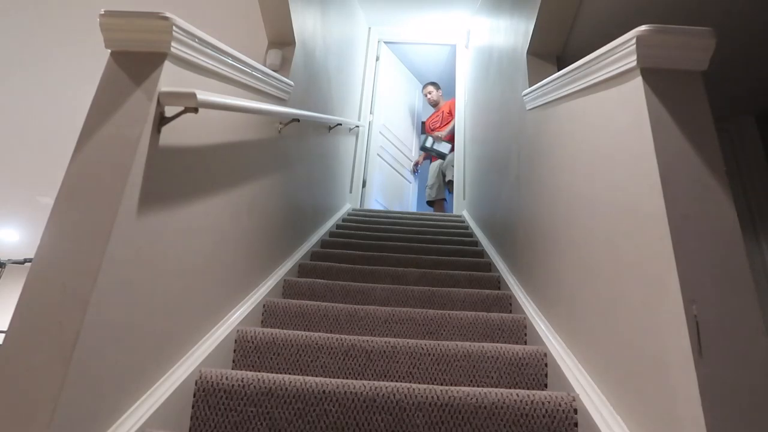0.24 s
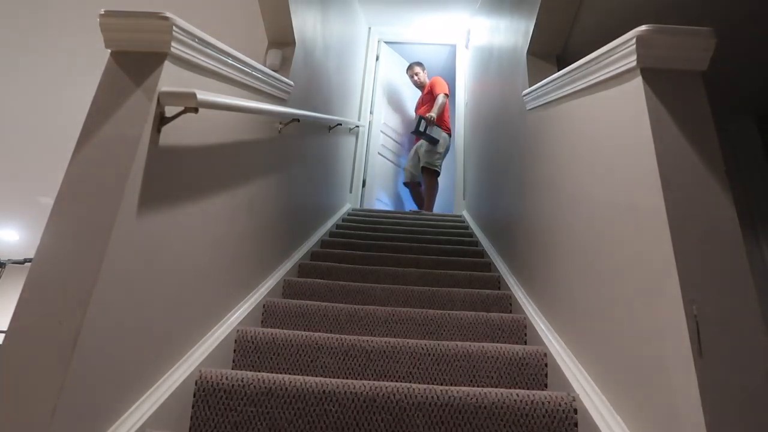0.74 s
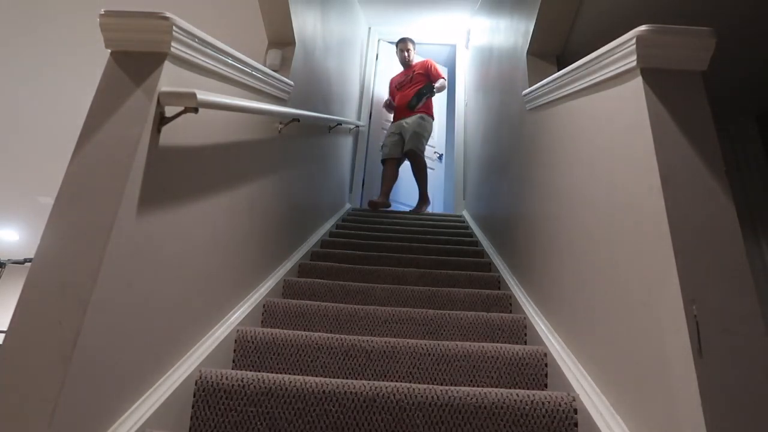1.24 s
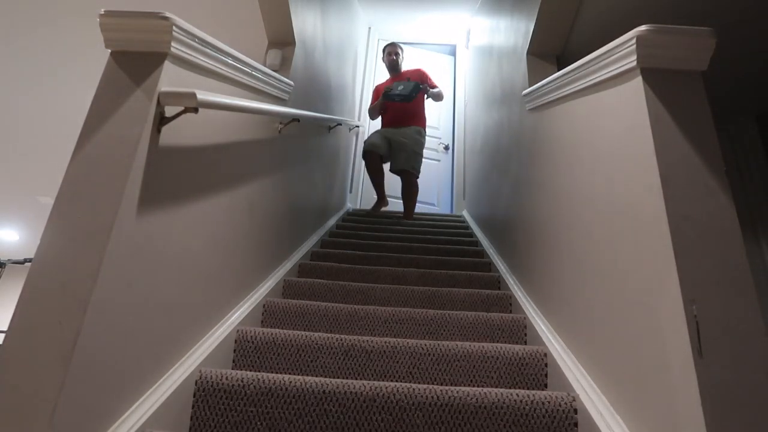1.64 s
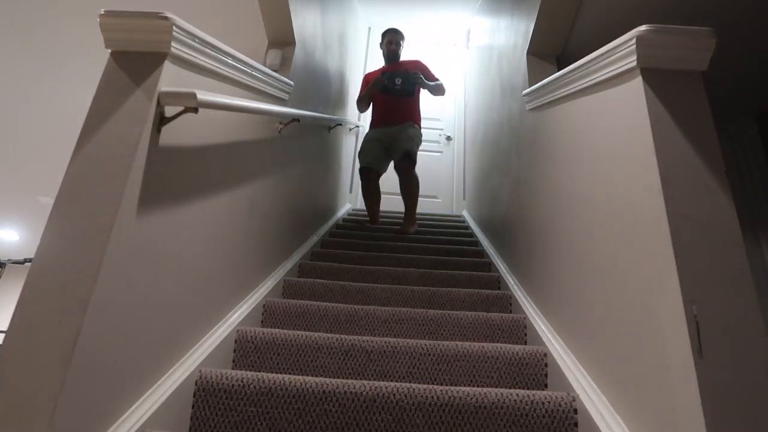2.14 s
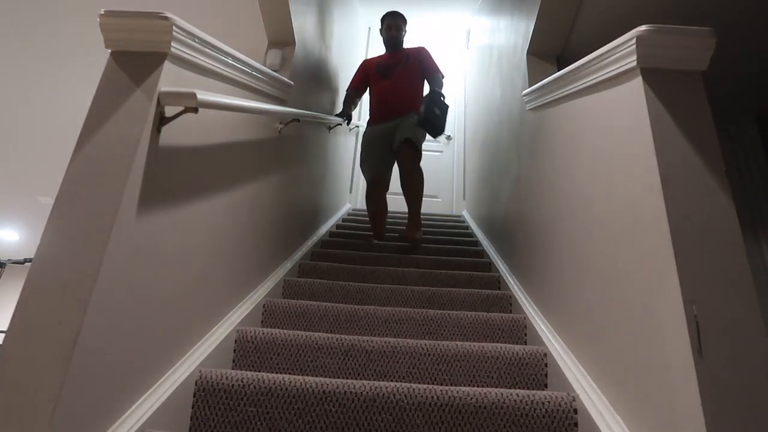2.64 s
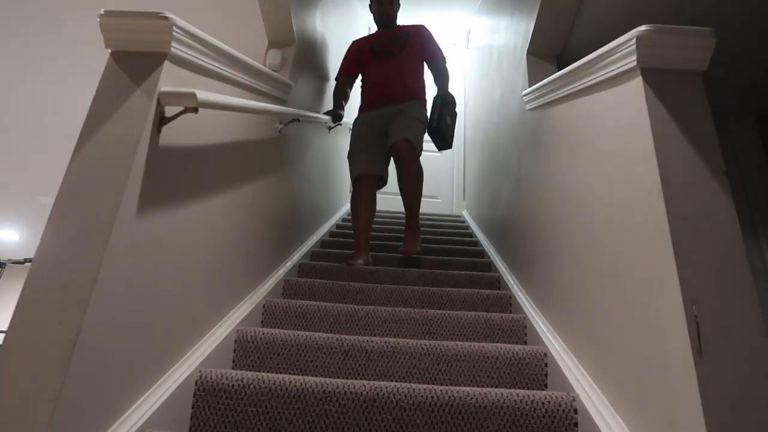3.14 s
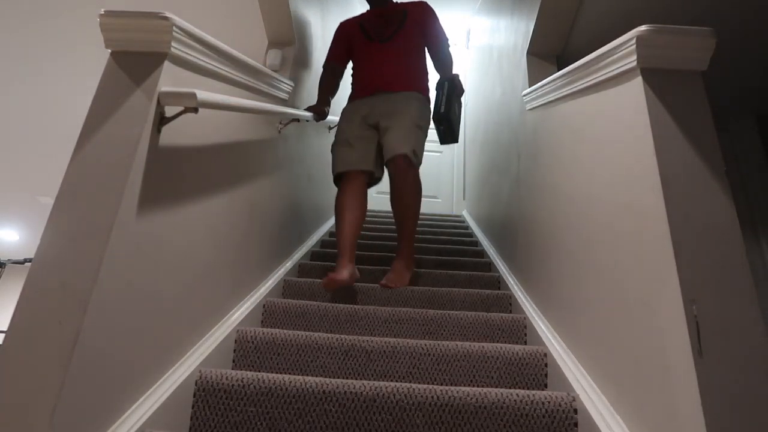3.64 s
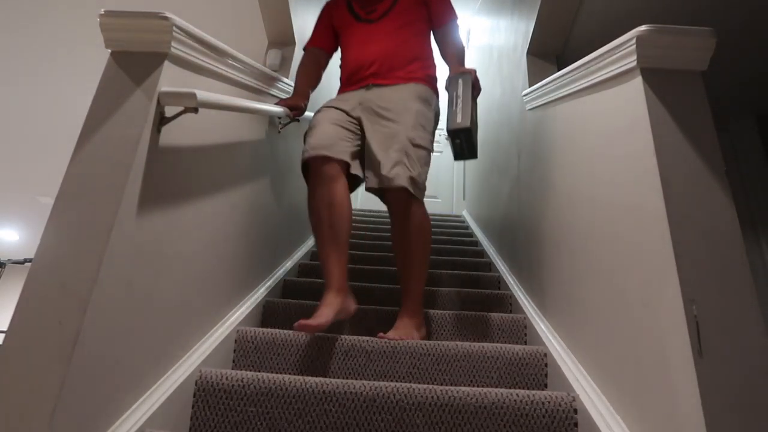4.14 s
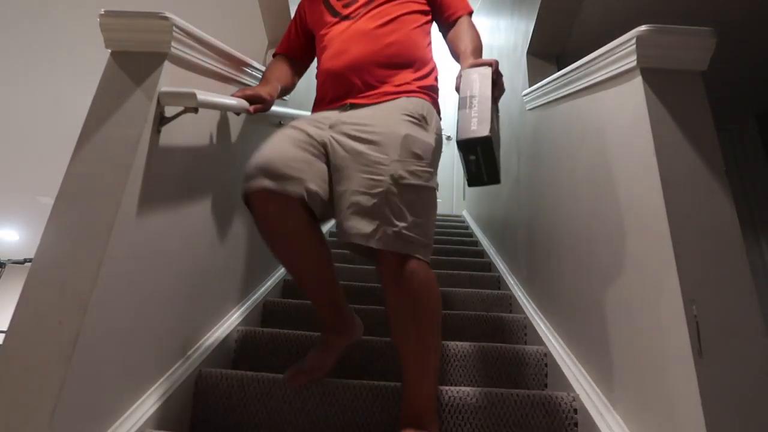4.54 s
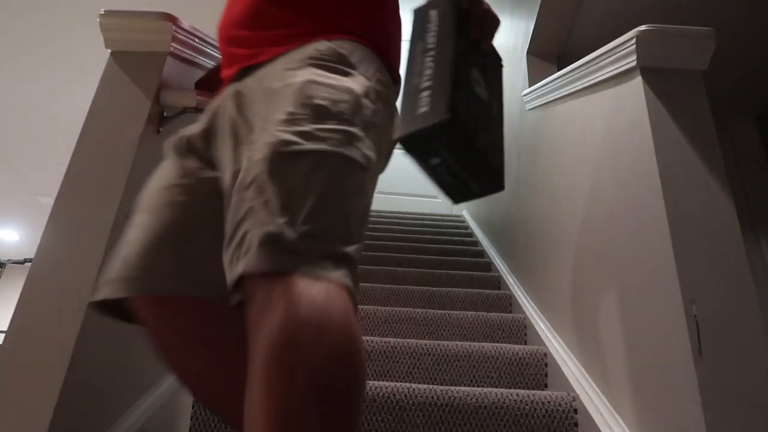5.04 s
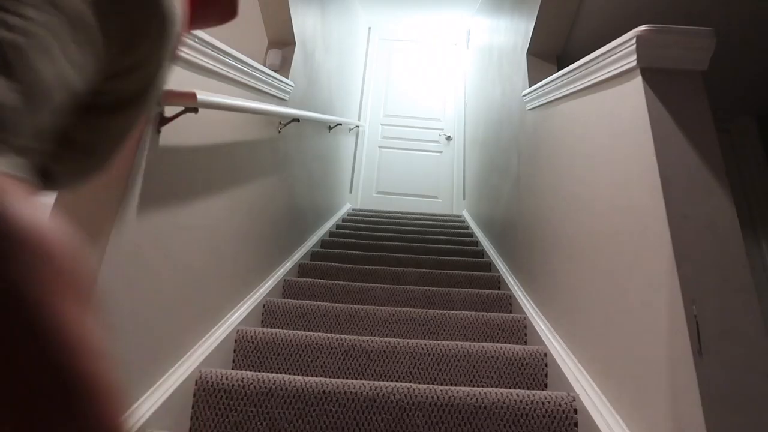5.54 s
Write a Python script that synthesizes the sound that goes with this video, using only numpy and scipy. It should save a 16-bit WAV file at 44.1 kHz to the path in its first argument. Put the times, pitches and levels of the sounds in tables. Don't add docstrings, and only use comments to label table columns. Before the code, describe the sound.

Near silence with faint house hum and slight creaks, then a door rattles, knocks shut sharply and its bolt snaps. Bare heels drop in dull low booms down carpeted wooden stairs, with cloth swishing and small creaks. The loudest thump comes near the bottom, then a firmer step on the basement floor. Fixed stereo microphone at the stair foot, short boxy reverberation.

```python
import sys
import numpy as np
from scipy import signal
from scipy.fft import rfft, irfft, next_fast_len
from scipy.io import wavfile
from scipy.ndimage import uniform_filter1d

SR = 44100
rng = np.random.default_rng(int(sys.argv[2]) if len(sys.argv) > 2 else 0)


def generate_wav(signal):
    frames = np.transpose(np.atleast_2d(signal))
    scaled = np.clip(frames, -1, 1) * 32767
    pcm = np.round(scaled).astype(np.int16)
    wavfile.write(sys.argv[1], SR, pcm)


def undo_db(level):
    steps = np.asarray(level, float) / 20
    return 10 ** steps


N = 254898


def rms_one(x):
    return x / np.sqrt(np.mean(x ** 2) + 1e-20)


def at_hz(points, hz):
    table_hz, values = np.transpose(points)
    return np.interp(np.log(hz), np.log(table_hz), values)


def add(out, s, x):
    i = round(s * SR)
    out[i:i + len(x)] += x[:N - i]


def drift(rate):
    r = np.exp(-80 * np.pi * rate / SR)
    slow = signal.lfilter([1], [1, -2 * r, r * r], rng.standard_normal(N // 40 + 2002))[2000:]
    return np.interp(np.arange(N) / 40, np.arange(len(slow)), rms_one(slow))


def ring(force, hz, t60):
    r = undo_db(-60 / (t60 * SR))
    w = 2 * np.pi * hz / SR
    return signal.lfilter([0, np.sin(w)], [1, -2 * r * np.cos(w), r * r], force + 1e-18)


def swells(s, held_s, db, rise, fall, rest_db):
    t = np.arange(0, N + 64, 64)[:, None] / SR - np.array(s)
    shape = np.array(db) + rise * np.minimum(t, 0) - fall * np.maximum(t - np.array(held_s), 0)
    level = 10 * np.log10(undo_db(2 * shape).sum(axis=1) + undo_db(2 * rest_db))
    return np.interp(np.arange(N) / 64, np.arange(len(level)), level)


# (f/Hz, likeness 0 to 1)
LIKENESS = [(25, 1), (60, .9999), (125, .998), (250, .92), (1000, .95), (2000, .89), (4000, .66),
            (8000, .2), (13000, 0)]


def banded_noise(spectrum, patchy_db):
    out, together = 0, drift(5.9)
    lowest, highest = spectrum[0][0], spectrum[-1][0]
    edges = lowest * 2 ** np.arange(0, np.log2(highest / lowest) + .5, .5)
    white = rng.standard_normal((2, 2, N))
    for k, (low, high) in enumerate(zip(edges, np.minimum(edges[1:], .45 * SR))):
        band = signal.butter(2, [low, high], "band", fs=SR, output="sos")
        mid, side = signal.sosfilt(band, white[k % 2])
        hz = np.sqrt(low * high)
        alike = np.clip(at_hz(LIKENESS, hz), 0, 1)
        gain = undo_db(at_hz(spectrum, hz) + patchy_db * (0.49 * together + drift(11.4)))
        out = out + gain * (np.sqrt(1 + alike) * mid + np.sqrt(1 - alike) * side * [[1], [-1]])
    return rms_one(out)


# (f/Hz, level/dB per Hz)
HOUSE_COLOUR = [(15, -50), (25, -45), (59, -1), (91, -23), (122, -3.5), (204, -11.5), (233, 3), (266, -20),
                (305, -7), (378, -20), (1370, -30.5), (9030, -68), (15500, -54)]


def house():
    return undo_db(-55) * banded_noise(HOUSE_COLOUR, patchy_db=3.0)


# (f/Hz, width/Hz, rms level/dB)
HUM_LINES = [(120, 6, -63), (229.7, 6.5, -59), (305.6, 7, -71.5), (13000, 30, -83)]


def hum():
    return sum(undo_db(db) * rms_one(ring(rng.standard_normal(N), hz, 5.2 / width))
               for hz, width, db in HUM_LINES)


# (t/s, stair shudder level/dB, air push level/dB, sole scuff level/dB)
WEIGHT = [(.1, -60, -64, -50.5), (.63, -67, -49, -70), (.8, -55, -66, -49.5), (1.15, -70, -54, -52.5),
          (1.41, -38, -38, -47.5), (1.581, -36.5, -36, -45.5), (1.66, -42, -45, -41.5),
          (2.09, -36, -32.5, -50.5), (2.2, -29.5, -36, -38), (2.33, -38, -33, -35.5),
          (2.6, -33.5, -35, -43), (2.7, -35, -29.5, -42.5), (2.86, -32, -38, -69), (2.93, -36, -51, -43),
          (3.25, -35, -48, -48.5), (3.38, -43, -35, -45.5), (3.539, -46, -46, -48),
          (3.779, -34.5, -37, -49.5), (3.985, -38, -43, -48), (4.07, -62, -47, -44.5),
          (4.38, -38.5, -67, -48), (4.57, -35.5, -38, -50.5), (4.63, -45.5, -50, -42),
          (4.76, -53, -48, -48), (4.9, -43.5, -50, -46), (5.13, -44, -49, -41.5), (5.27, -44, -70, -42),
          (5.6, -70, -55, -47), (5.78, -65, -51, -45)]


def air_push():
    s, _, air_db, _ = np.transpose(WEIGHT)
    level_db = swells(s, 0, air_db, rise=280, fall=102, rest_db=-59)
    band = signal.butter(3, [33, 62], "band", fs=SR, output="sos")
    low = signal.sosfilt(band, rng.standard_normal(N + SR))[SR:]
    return undo_db(level_db - 2.5) * rms_one(low)


def shudder():
    s, shudder_db, _, _ = np.transpose(WEIGHT)
    level_db = swells(s, 0, shudder_db, rise=400, fall=120, rest_db=-60)
    push = rng.standard_normal(N) * undo_db(4.8 * drift(21.4))
    frame = ring(push, 104.4, 0.1) + 0.31 * ring(push, 161.6, 0.13) - 0.55 * ring(push, 200, 0.081)
    return undo_db(level_db + 3.5) * rms_one(frame)


# (f/Hz, level/dB per Hz)
SCUFF_COLOUR = [(150, -17), (250, -1), (468, -6), (544, -13), (807, -4.5), (1360, -13), (4000, -24),
                (5200, -77), (8800, -120)]


def scuff():
    s, _, _, scuff_db = np.transpose(WEIGHT)
    level_db = swells(s, 0, scuff_db, rise=61.5, fall=94, rest_db=-55)
    return undo_db(level_db - 2.0) * banded_noise(SCUFF_COLOUR, patchy_db=2.5)


# (f/Hz, level/dB per Hz)
PALM_COLOUR = [(5400, -6), (6400, -0.5), (9000, -9.5), (12000, -4), (15000, -13)]
# (t/s, held/s, level/dB)
SLIDES = [
    (3.15, 0.44, -72),
    (3.74, .15, -67.5),
    (4.33, 0.1, -58),
    (4.9, 0.078, -68),
]


def rail():
    level_db = swells(*np.transpose(SLIDES), rise=120, fall=38, rest_db=-95)
    return undo_db(level_db + 9.5) * banded_noise(PALM_COLOUR, patchy_db=3)


# (f/Hz, level/dB per Hz)
CLOTH_COLOUR = [(710, -23), (1200, -34), (1450, -1.5), (1830, -0.5), (2570, -1), (2920, -0.5), (4310, -3.5),
                (7390, -8.5), (12100, -13), (15000, -26.5)]
# (t/s, held/s, swish level/dB)
STRIDES = [(1.5, 0.04, -53.5), (1.64, 0.019, -53.5), (2.05, .1, -61.5), (2.24, 0.029, -51),
           (2.6, 0.017, -54.5), (2.77, 0.011, -54), (2.91, 0.025, -54), (3.208, 0.23, -46),
           (3.78, 0.077, -46), (4.0, 0.05, -48.5), (4.34, 0.11, -48), (4.55, 0.13, -52.5),
           (4.97, 0.056, -53.5), (5.15, 0.093, -53), (5.63, .15, -55)]


def shorts():
    level_db = swells(*np.transpose(STRIDES), rise=88, fall=75, rest_db=-60.5)
    return undo_db(level_db - 1.0) * banded_noise(CLOTH_COLOUR, patchy_db=1.5)


# (t/s, peak level/dB, rattle t60/s, body tone f/Hz, tone re rattle level/dB)
LATCH = [(1.467, -42, .12, 970, 5), (1.49, -41, 0.054, 1020, 1), (1.531, -38.5, 0.072, 972, -1),
         (1.586, -35, .1, 1010, -1), (1.6, -36, 0.05, 1060, 4.5), (1.626, -30, .1, 1000, 4.5),
         (1.641, -25, 0.045, 900, -1.5), (1.661, -42, 0.058, 760, 10), (1.974, -41, 0.27, 720, 6),
         (2.126, -38.5, 0.11, 706, 2), (2.169, -40.5, 0.16, 860, 8), (2.195, -36, 0.079, 990, 2),
         (2.2254, -14.5, 0.11, 1450, -14), (2.234, -16, .1, 1150, -8), (2.242, -25, 0.2, 1080, -19),
         (2.307, -31, 0.09, 1020, 4.5), (2.322, -37.5, 0.26, 1010, 9), (2.489, -31.5, 0.1, 930, -6)]
BOLT = [
    (2.5632, -18.5, 0.065, 970, 1),
    (2.580, -29, .15, 880, 2),
]
# (t/s, peak level/dB, body tone f/Hz, tone re rattle level/dB)
CREAKS = [(.434, -48, 1030, -2), (.624, -39, 950, -21), (.745, -43, 1150, -1), (1.121, -48, 1040, 14),
          (2.744, -32.5, 890, -7), (2.951, -36, 850, -3), (4.048, -32, 2100, -6.5), (4.208, -41, 1030, 3),
          (4.589, -34, 835, 2.5), (4.727, -38, 1280, -27), (4.815, -39.5, 900, 3), (5.092, -39, 1340, -2),
          (5.129, -57, 960, -4), (5.213, -47, 1080, -16), (5.39, -39.5, 1940, -14), (5.511, -45, 740, 7.5),
          (5.744, -35.5, 2300, -5.5)]


def blows():
    door = [(row, -4) for row in LATCH] + [(row, -5.5) for row in BOLT]
    on_door = [(s, db, t60, dull_db, hz, tone_db) for (s, db, t60, hz, tone_db), dull_db in door]
    return on_door + [(s, db, 0.11, -4.5, hz, tone_db) for s, db, hz, tone_db in CREAKS]


# (f/Hz, level/dB, t60/s)
DOOR_MODES = [(650, 16, 0.011), (850, -25, .05), (1150, 11.5, 0.057), (1470, 10, 0.039), (1887, 5.5, 0.085),
              (2300, 10.5, 0.015), (3370, 2, 0.1), (6500, 27, 0.015)]
# (t/s, level/dB, f/Hz, t60/s)
PINGS = [(1.481, -37.5, 362, .15), (1.530, -51, 8900, .03), (1.627, -48, 8640, .066),
         (1.630, -36.5, 2300, 0.039), (1.662, -48.5, 8900, 0.087), (1.665, -35, 352, 0.18),
         (1.976, -34.5, 458, 0.043), (2.125, -35, 471, 0.36), (2.180, -30.5, 314.5, 0.23),
         (2.5647, -13, 1038, 0.017), (2.573, -41, 1883, 0.077), (2.589, -30.5, 361, 0.16),
         (5.390, -37, 3200, 0.0052), (5.512, -37, 1200, 0.0094)]


def knocks():
    t, force, direct = np.arange(SR // 3) / SR, np.zeros(N), np.zeros(N)
    hits = blows()
    rattles = rng.standard_normal((len(hits), len(t)))
    grit = undo_db(4.6 * rng.standard_normal((len(hits), len(t) // 60 + 1)))
    grit = grit.repeat(60, axis=1)[:, :len(t)]
    hz = np.fft.rfftfreq(len(t), 1 / SR)
    for (s, db, t60, dull_db, tone_hz, tone_db), rattle in zip(hits, rattles * grit):
        colour = undo_db(dull_db * hz / 1000) * hz ** 2 / (hz ** 2 + 1150 ** 2)
        burst = rms_one(irfft(rfft(rattle) * colour, len(t))) * undo_db(-60 * t / max(t60, .01))
        tick = rms_one(signal.lfilter([1], [1, -.6], rattle)) * undo_db(-43 - 60 * t / 0.0013)
        tone = np.sin(2 * np.pi * tone_hz * t) * undo_db(tone_db - 60 * t / 0.03)
        add(force, s, undo_db(db) * burst)
        add(direct, s, undo_db(db) * (undo_db(-11) * burst + tick + tone))
    for (s, db, ping_hz, t60), rattle in zip(PINGS, rattles):
        unsteady = 1 + 0.26 * rms_one(uniform_filter1d(rattle, size=40))
        add(direct, s, undo_db(db - 60 * t / t60) * np.sin(2 * np.pi * ping_hz * t) * unsteady)
    ringing = sum(undo_db(db - 58.5) * ring(force, mode_hz, t60) for mode_hz, db, t60 in DOOR_MODES)
    return direct + ringing


# (t/s, peak level/dB, tread boom f/Hz, rebound gap/s, loss per rebound level/dB)
HEELS = [
    (2.236, -22.5, 120, 0.023, 7),
    (2.648, -17, 154.5, .0238, 4),
    (2.805, -17, 154, .0196, 4),
    (2.929, -18, 126.4, .0215, 8),
    (3.378, -16.5, 105, 0.03, 6),
    (3.949, -19.5, 99.7, .036, 7.5),
    (4.357, -26.5, 100, .047, 5),
    (4.52, -11, 105.4, .027, 8),
    (4.751, -25, 101, .022, 10),
]
# (t/s, peak level/dB, boom f/Hz, knock f/Hz, knock re boom level/dB)
FLOOR_STEP = [
    (5.071, -23, 122, 262, -8),
    (5.088, -15.5, 259, 372, -2.5),
]


def slaps():
    out, t = np.zeros(N), np.arange(SR // 4) / SR
    heels = HEELS + FLOOR_STEP[1:]
    band = signal.butter(2, (260, 710), "band", fs=SR, output="sos")
    puffs = signal.sosfilt(band, rng.standard_normal((len(heels), len(t))))
    for (s, db, *_), puff in zip(heels, puffs):
        add(out, s, undo_db(db - 25 - 60 * t / 0.11) * np.minimum(t / 0.0053, 1) * rms_one(puff))
    return out


# (t/s of strongest touch, peak level/dB, tread boom f/Hz, gap/s)
TOES = [
    (1.426, -22.5, 108, .024),
    (2.106, -32, 133, .020),
    (3.244, -21, 99, .023),
    (3.806, -29, 127, .028),
]
ROLL_DB = [-11.5, -7.5, 0.5, -6, -10]
# (t/s, peak level/dB, boom f/Hz, knock re boom level/dB)
TAPS = [(0.102, -35, 169, -18), (0.626, -46, 66, 2), (.846, -36.5, 113, -13), (1.575, -33, 199, -9),
        (1.626, -30.5, 182, -3), (3.485, -30.5, 110, -8), (3.719, -54, 124, 2), (4.032, -28.5, 198, -8.5),
        (4.062, -32.5, 163, -20), (4.573, -28, 111, -16), (4.598, -24, 106, -5.5), (4.652, -39, 120, -14),
        (4.867, -32.5, 178, -2), (4.914, -39, 162, -16), (5.152, -30, 107, -4), (5.519, -45, 105, 6)]


def contacts():
    touches = [(s + k * gap, db - k * loss_db, hz * 0.95 ** k, -10 - 0.237 * (hz - 110))
               for s, db, hz, gap, loss_db in HEELS for k in range(3)]
    touches += [(s + (k - 2) * gap, db + roll_db, hz, -20.5 - roll_db / 2)
                for s, db, hz, gap in TOES for k, roll_db in enumerate(ROLL_DB)]
    on_stair = []
    for s, db, hz, knock_db in touches + TAPS:
        t60 = max(.095 - .005 * (db + 30), 9.5 / hz)
        knock_hz = max(217.6, 2.134 * hz)
        on_stair.append((s, db, hz, t60, knock_hz, knock_db))
    return on_stair + [(s, db, hz, 0.036, knock_hz, knock_db) for s, db, hz, knock_hz, knock_db in FLOOR_STEP]


def footfalls():
    out, t = np.zeros(N), np.arange(SR // 2) / SR
    lead_s, hold_s, rise_cycles = .014, 0.0025, 0.66
    late = t - lead_s - .008
    sag = late + 0.001 * (1 - np.exp(-late / 0.0098))
    for s, db, boom_hz, t60, knock_hz, knock_db in contacts():
        t60 = max(t60, .02)
        fade_db = -60 * np.maximum(late, 0) / t60
        swell = np.exp(-(np.minimum(late, 0) * boom_hz / rise_cycles) ** 2)
        boom = np.cos(2 * np.pi * boom_hz * sag) * undo_db(-60 * np.maximum(late - hold_s, 0) / t60)
        knock = np.cos(2 * np.pi * knock_hz * sag) * undo_db(knock_db + 3.54 * fade_db)
        nosing = np.cos(2 * np.pi * 1.726 * knock_hz * sag) * undo_db(knock_db - 12.0 + 3.2 * fade_db)
        add(out, s - lead_s, undo_db(db - 1.0) * swell * np.minimum(t / 0.0052, 1) * (boom + knock + nosing))
    return out


def stairwell(x):
    t60_s, wall_cut_hz = 0.25, 3800
    size = next_fast_len(N + SR)
    hz = np.fft.rfftfreq(size, 1 / SR)
    dull, out = 1 / (1 + 1j * hz / wall_cut_hz), np.zeros((2, len(hz)), complex)
    for k, lag in enumerate(rng.uniform(.009, .03, 16)):
        loop = undo_db(-60 * lag / t60_s) * dull * np.exp(-2j * np.pi * hz * lag)
        out[k % 2] += loop / (1 - loop) * (-1) ** (k // 2)
    alike = np.clip(at_hz(LIKENESS, np.maximum(hz, 1)), 0, 1)
    mid, side = out[0] * np.sqrt(1 + alike), out[1] * np.sqrt(1 - alike)
    return irfft(rfft(x, size) * np.array([mid + side, mid - side]), size)[:, :N]


def spread(x):
    hz = np.fft.rfftfreq(N, 1 / SR)
    alike = at_hz(LIKENESS, np.maximum(hz, 1))
    quarter_turn = 1j * np.tanh(3 * np.cos(2 * np.pi * hz * .004))
    side = 0.4 * irfft(rfft(x) * quarter_turn * np.sqrt((1 - alike) / (1 + alike)), N)
    return np.array([x + side, x - side])


def scene():
    feet, door = footfalls(), knocks()
    room = stairwell(undo_db(-20.5) * feet + undo_db(-13.0) * door)
    background = house() + air_push() + shudder()
    rubbing = scuff() + rail() + shorts()
    return background + rubbing + room + spread(hum() + door + slaps() + feet)


def low_pass(x):
    return signal.sosfilt(signal.butter(12, 15610, fs=SR, output="sos"), x)


# (t/s, cut-off f/Hz)
TOP_CUT = [(0, 14800), (5.2, 15300), (5.45, 14100), (5.78, 9960)]
# (t/s, left minus right level/dB)
LEAN = [(0, 0), (5.1, 0), (5.5, 1), (5.78, 1.5)]


def record(dry):
    s, cut_hz = np.transpose(TOP_CUT)
    hz, at, frames = signal.stft(dry, SR, nperseg=1024)
    frames = frames / np.sqrt(1 + (hz[:, None] / np.interp(at, s, cut_hz)) ** 80)
    closed = signal.istft(frames, SR, nperseg=1024)[1][:, :N]
    lean_db = np.interp(np.arange(N) / SR, *np.transpose(LEAN))
    mix = closed * undo_db(np.array([lean_db, -lean_db]) / 2)
    return low_pass(mix)


dry = scene()
out = record(dry)
generate_wav(out)
```